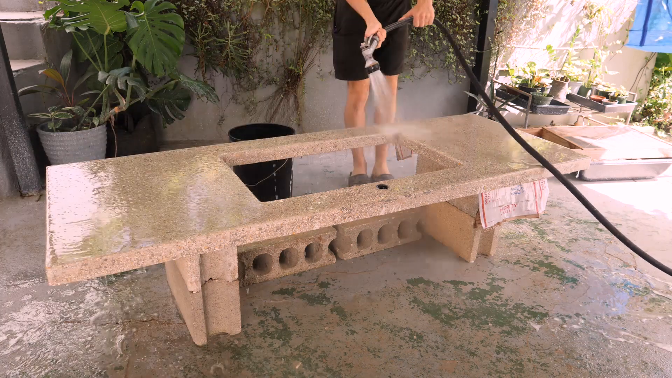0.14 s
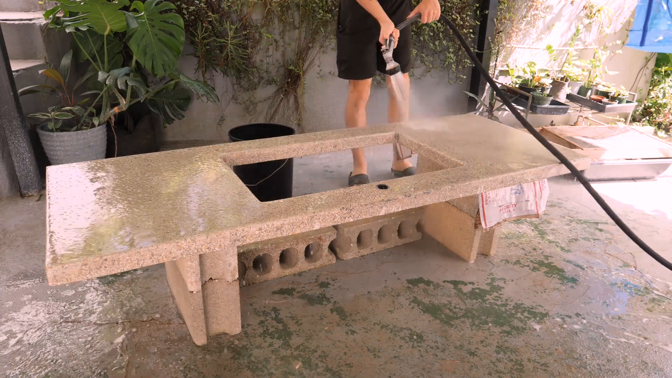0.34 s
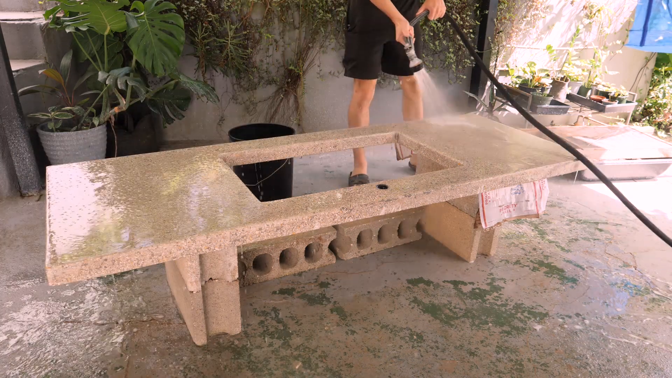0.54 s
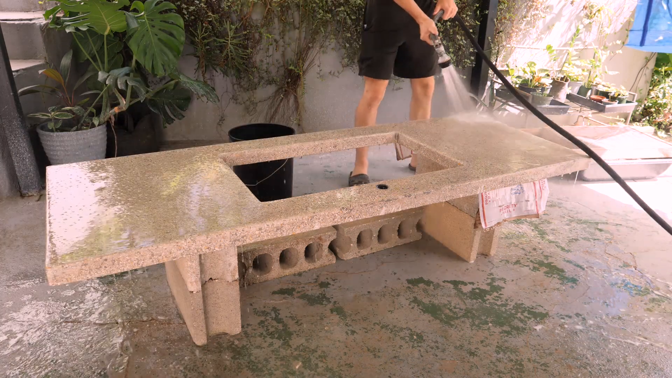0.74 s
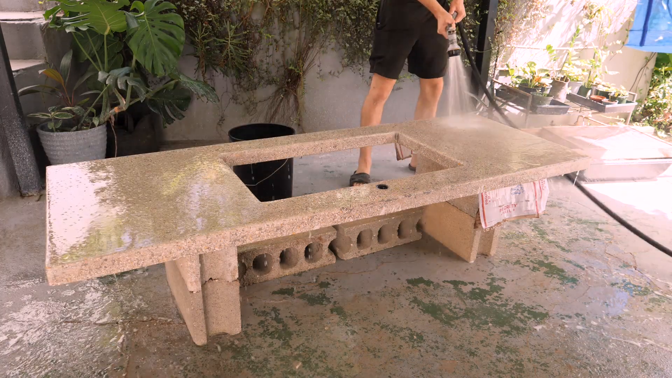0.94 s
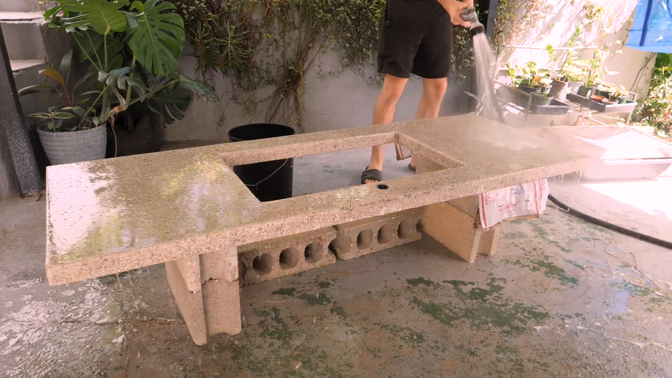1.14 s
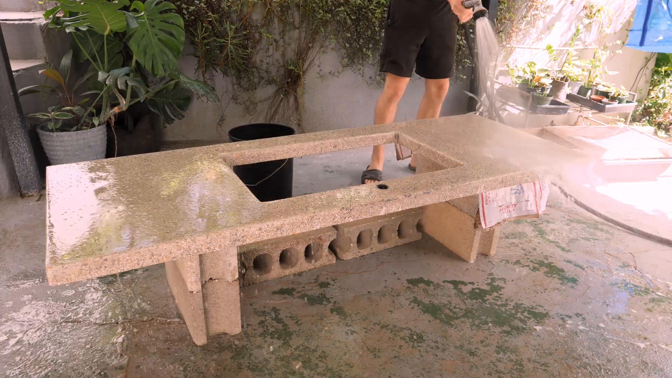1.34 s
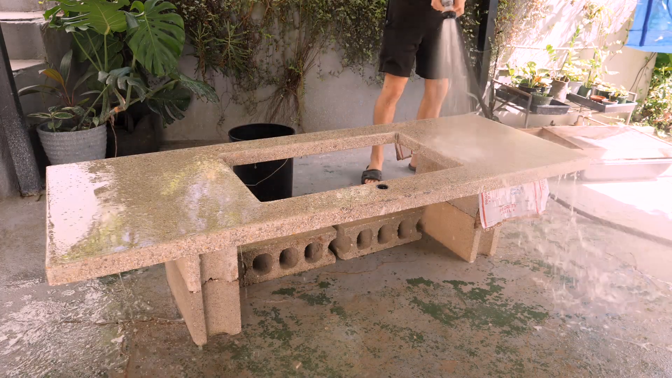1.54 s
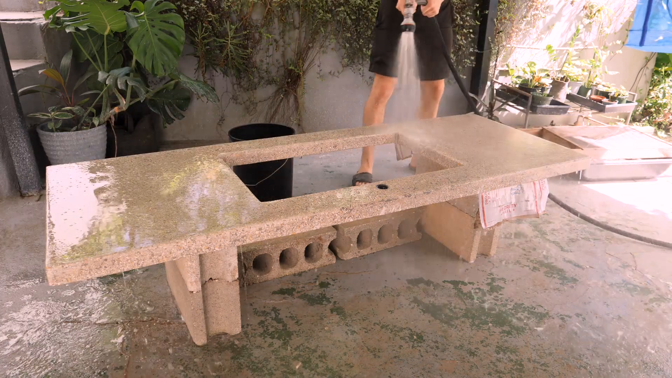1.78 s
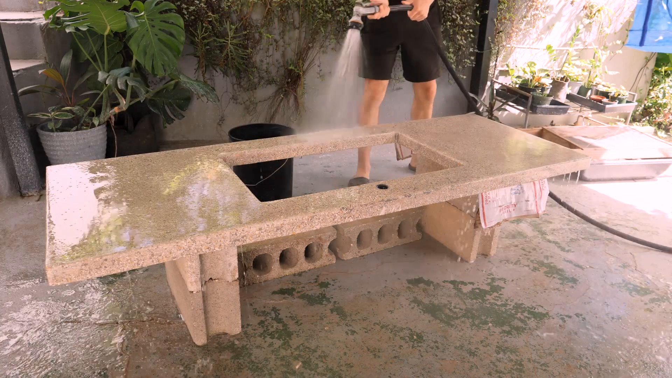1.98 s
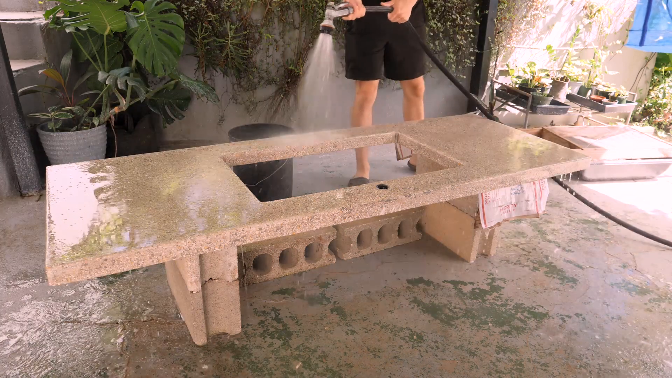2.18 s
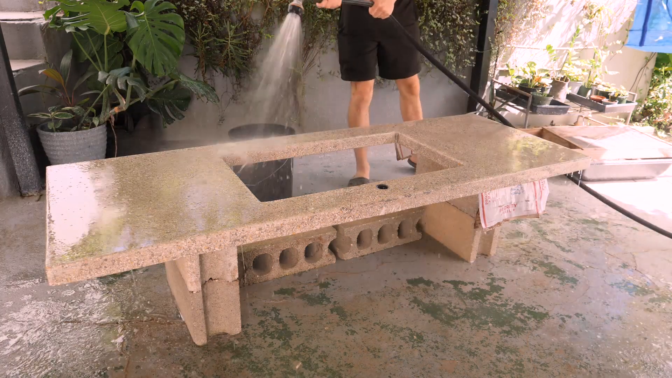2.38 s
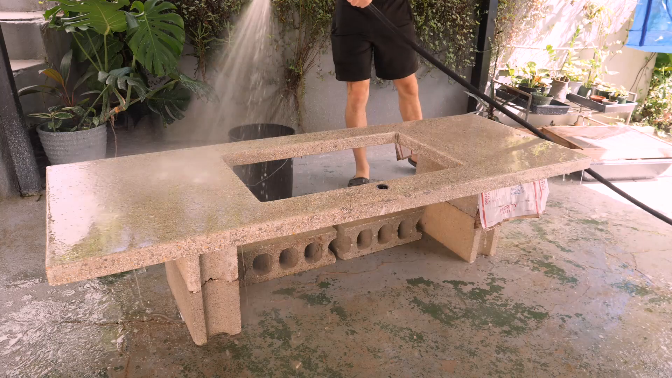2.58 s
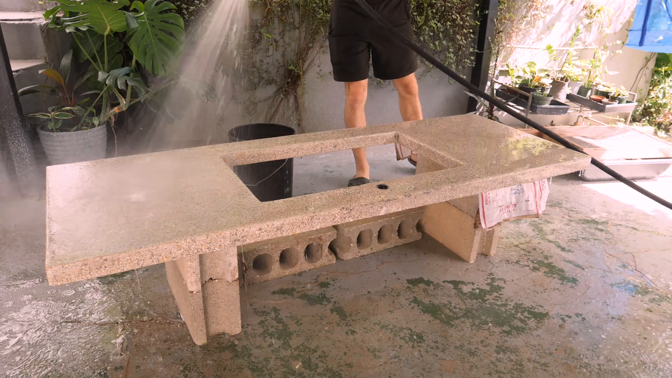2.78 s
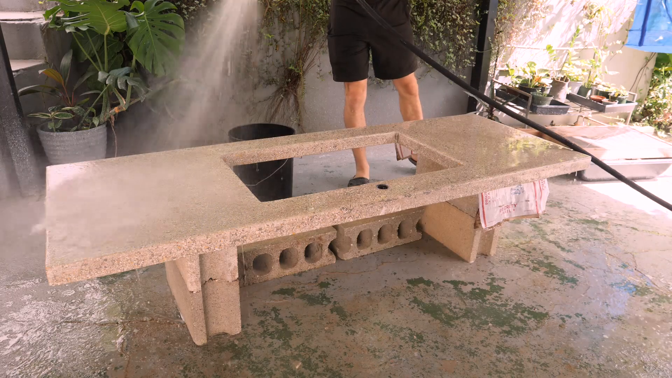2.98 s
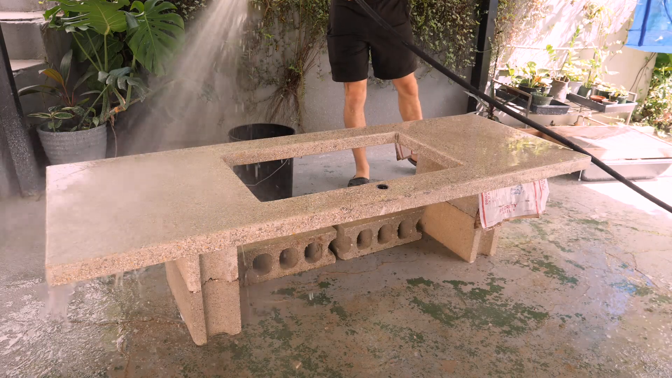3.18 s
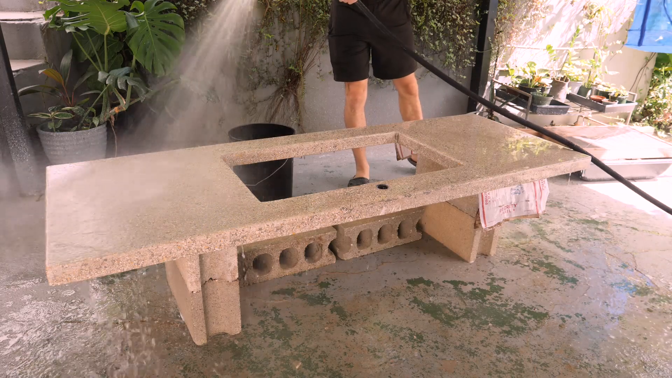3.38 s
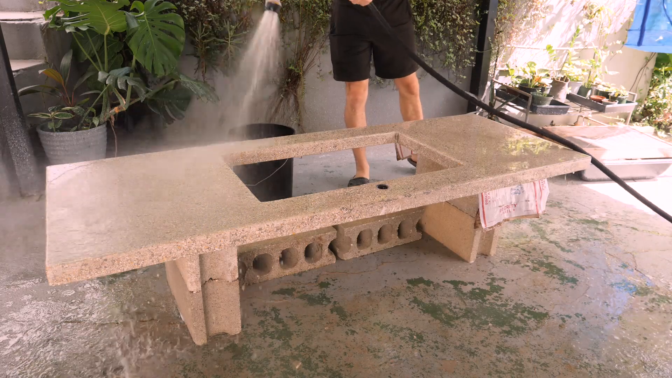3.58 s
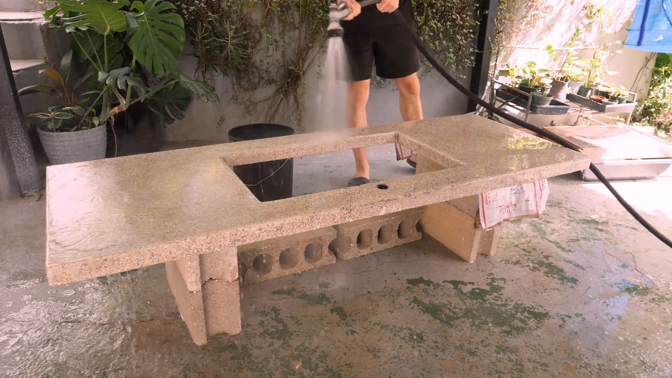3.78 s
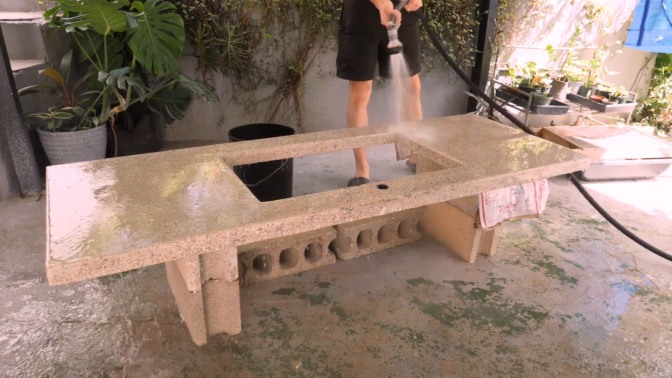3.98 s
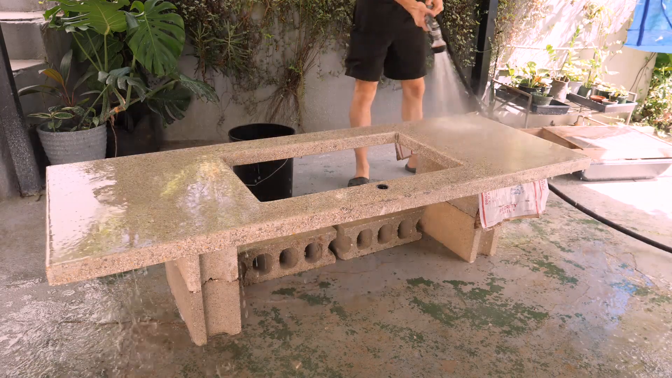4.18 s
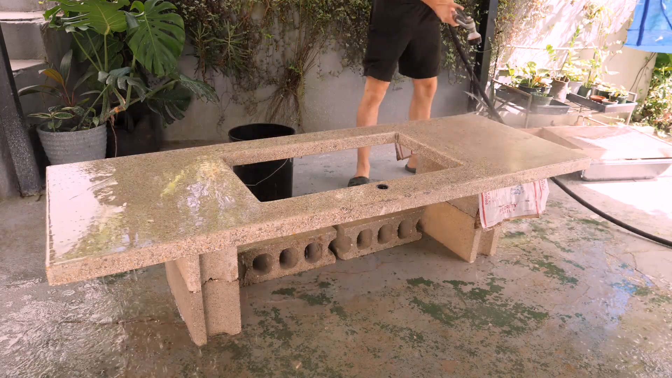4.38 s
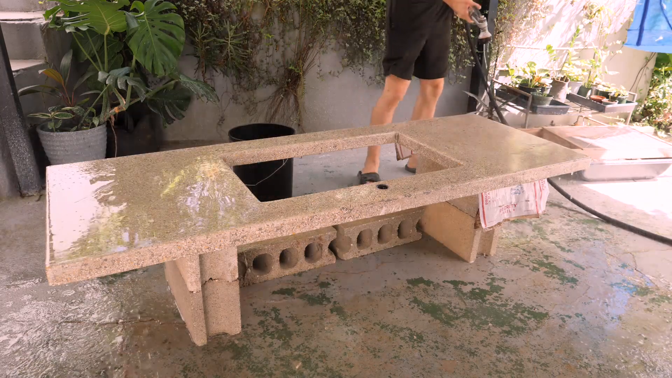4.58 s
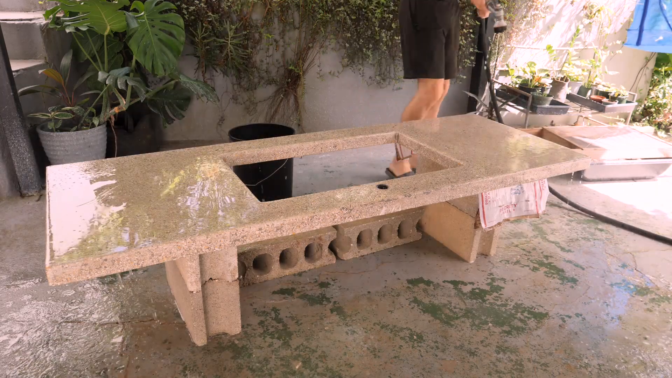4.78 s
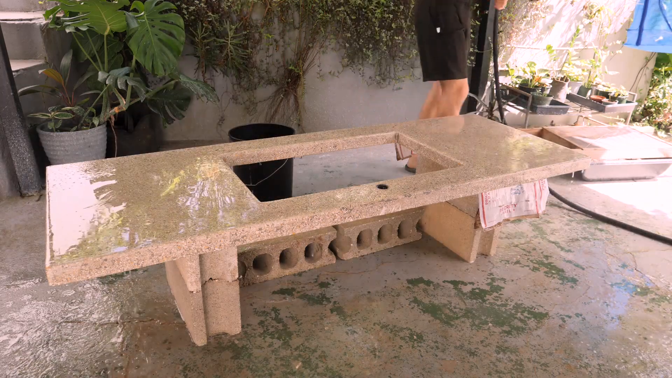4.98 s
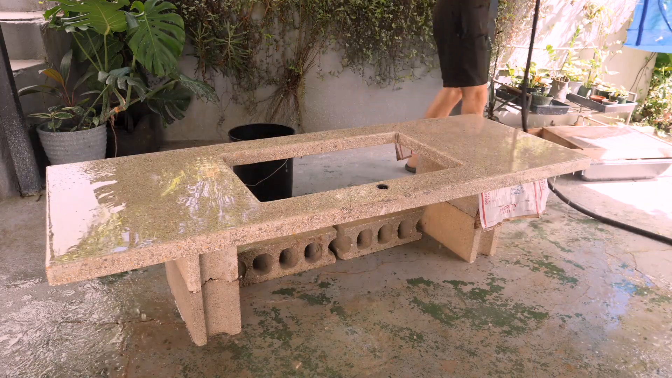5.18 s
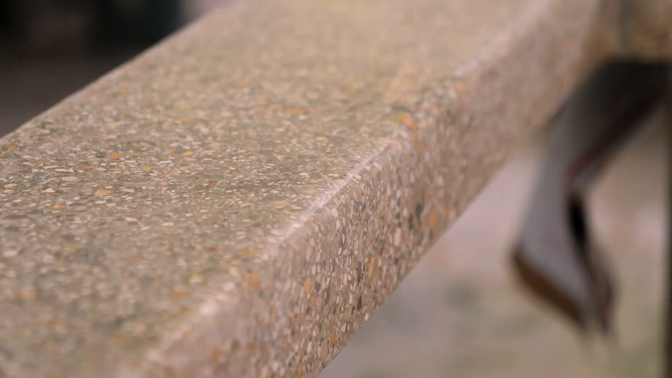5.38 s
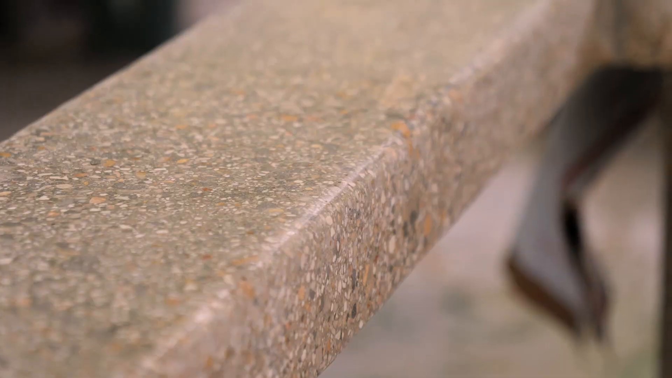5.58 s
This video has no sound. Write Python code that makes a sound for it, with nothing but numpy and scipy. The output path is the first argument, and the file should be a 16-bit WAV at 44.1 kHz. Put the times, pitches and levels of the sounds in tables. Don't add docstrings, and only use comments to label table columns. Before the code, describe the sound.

Steady bright water spray drums on a wet stone countertop outdoors, stops abruptly, leaving ticking drips, footsteps and then a sudden quiet.

```python
import sys
import numpy as np
from scipy import signal
from scipy.fft import rfft, irfft, next_fast_len
from scipy.io import wavfile
from scipy.ndimage import uniform_filter1d, map_coordinates

SR = 44100
rng = np.random.default_rng(int(sys.argv[2]) if len(sys.argv) > 2 else 0)


def elevation(decibels):
    levels = np.asarray(decibels, float)
    return 10 ** (levels / 20)


def file_out(sig):
    cols = np.atleast_2d(sig).T
    lim = np.clip(cols, -1, 1)
    pcm = np.round(lim * 32767).astype(np.int16)
    wavfile.write(sys.argv[1], SR, pcm)


N = 248670
T = np.arange(N) / SR

# start_s, squareness (negative glancing, positive full on), left_minus_right_db,
# nozzle_facing_db
AIM = [(0, -0.61, 0, 0.5), (.32, 0.2, -0.1, 2), (.89, -0.32, -1.4, 1.5), (1.31, -1.15, -1.5, -0.5),
       (1.46, -0.64, 0, 1.5), (1.62, -.7, -1.3, 3), (2.06, 0.082, -0.3, 0.5), (2.29, 0.24, -0.3, 1.5),
       (2.82, -0.22, 1.4, -1), (3.14, 0.18, 0.2, 0), (3.39, .2, 1.2, -1), (3.65, -.2, .42, -1),
       (3.92, 0.17, 0, -1.5), (4.28, -1.95, -.2, 4), (4.45, 0.24, 1.2, 1)]
# start_s, pitch_hz, level_db
SLAB_SPOTS = [(0, 861, -57), (0.25, 840, -55), (0.571, 1070, -56), (1.2, 906, -56), (1.36, 901, -52.5),
              (1.53, 898, -54.5), (1.51, 1292, -52.5), (1.79, 1436, -57), (2.4, 1195, -57),
              (2.43, 1001, -54), (2.6, 1190, -60), (2.64, 826, -69), (2.76, 734, -62), (2.93, 1087, -57),
              (2.97, 916, -57), (3.07, 725, -60), (3.17, 1036, -54), (3.29, 1143, -57.5), (3.45, 1030, -56),
              (3.8, 850, -56)]
# frequency_hz, level_db (per Hz)
HISS_COLOUR = [(2350, -29), (4000, -4.5), (4490, -2.5), (5270, -4), (5880, -4), (7570, -2), (9530, -0.5),
               (12900, 0.5), (14700, -3.5), (16000, -8.5)]
# frequency_hz, level_db (per Hz)
SPLASH_COLOUR = [(820, -14), (1400, -3.5), (1590, -4.5), (2200, -1), (2570, 0.5), (3180, -1.5), (4490, -3),
                 (5280, -5), (6040, 4), (7000, -11.5), (9100, -7), (15400, -120)]
# frequency_hz, level_db (per Hz)
SLAB_COLOUR = [(150, -38), (250, -24), (524, -15), (620, -12.5), (710, -7.5), (955, -4), (1010, -2.5),
               (1510, -8.5), (2000, -15), (2600, -24), (4400, -120)]
# frequency_hz, likeness (0 to 1)
LIKENESS = [(60, .9999), (300, 1), (700, 0.97), (1400, 0.87), (3000, 0.89), (5000, .84), (8000, 0.82),
            (10500, 0.82), (15000, 0.32)]
# start_s, level_db
RUNOFF = [
    (4.43, -60.5),
    (4.55, -61.5),
    (4.63, -59.5),
    (4.84, -64.5),
    (5.07, -67),
    (5.24, -61),
    (5.41, -59.5),
    (5.45, -61),
]
# start_s, peak_db, pitch_hz, left_minus_right_db
DROPS = [(4.452, -39, 5250, 6), (4.502, -35, 5950, -6), (4.538, -53, 5370, 1), (4.581, -34, 8460, 5),
         (4.6453, -34, 9000, 6.5), (4.6534, -37, 9050, 2), (4.6884, -45, 8510, -2),
         (4.763, -42, 8950, -0.5), (4.8308, -36, 8200, 6.5), (4.877, -40, 5560, -6),
         (4.9427, -36, 10200, 4), (4.995, -49, 8910, 3.5), (5.0964, -55, 8320, 3), (5.112, -36.5, 7900, 5),
         (5.1514, -45, 7850, 0.0), (5.2177, -45, 4090, 1), (5.239, -41, 8830, -8), (5.323, -36, 7260, 1)]
# start_s, level_db, pitch_hz, width_octaves
SLAPS = [(4.504, -60, 5650, 0.32), (4.55, -59, 2080, 0.61), (4.59, -66, 7900, .53),
         (4.652, -51.5, 8860, 0.85), (4.684, -44, 8300, 0.74), (4.704, -51.5, 2650, .25),
         (4.706, -55, 3620, 0.28), (4.71, -48, 5030, 1), (4.763, -53.5, 9000, .5), (4.785, -61, 3760, .4),
         (4.84, -55, 9000, .6), (4.877, -52, 5760, 0.78), (4.995, -55.5, 8900, .5),
         (5.022, -58.5, 3100, 0.98), (5.104, -52.5, 4100, 0.42), (5.113, -52, 8500, 0.73),
         (5.175, -56.5, 6500, 0.67), (5.217, -48, 4180, 0.52), (5.239, -43.5, 9000, 0.34),
         (5.243, -51, 4850, 0.81), (5.29, -52, 3850, 1), (5.322, -46, 7660, 0.45),
         (5.322, -50.5, 5500, 0.19), (5.324, -51, 3970, 0.67)]
# start_s, level_db, pitch_hz
SHEETS = [
    (1.21, -46.5, 3730),
    (1.6, -44.5, 4830),
    (1.665, -42.5, 3180),
    (1.739, -48, 4730),
    (1.86, -47.5, 4000),
    (3.43, -48, 2750),
    (3.575, -43, 2750),
    (3.605, -47.5, 2710),
    (3.66, -47.5, 3830),
    (3.97, -51.5, 2460),
]
# frequency_hz, time_to_fall_60_db_s
YARD_DECAY = [(200, 0.38), (2000, 0.23), (10000, 0.23)]
# start_s, level_db
STEPS = [
    (4.385, -72.5),
    (4.615, -65),
    (4.865, -67.5),
    (5.1, -65),
    (5.365, -67.5),
]
# delay_after_heel_s, level_db, pitch_hz, width_octaves
STEP_PARTS = [
    (-.027, -0.5, 730, 1),
    (0, -0.5, 300, 2.4),
    (0, -1, 497, .07),
    (0.042, -7.5, 118.2, 0.36),
]
# start_s, level_db, pitch_hz, time_to_fall_60_db_s
KNOCKS = [
    (1.143, -58, 224, 0.47),
    (1.143, -52.5, 433, 0.31),
    (5.44, -66, 270, .3),
    (5.495, -63, 210, .12),
]
# start_s, rumble_db
TRUCK = [
    (0, -60),
    (.29, -57.5),
    (.5, -57),
    (.64, -58),
    (.94, -71),
    (1.15, -78),
    (1.6, -110),
]
# pitch_hz, level_over_rumble_db
TRUCK_HUMS = [(85, -7), (143, -8), (241, -10), (324, -14)]
# frequency_hz, level_db (per Hz)
RUMBLE_COLOUR = [(29, -46), (50, -13), (75, -11), (108, -7), (144, 1), (210, -5), (237, -3.5), (296, -6),
                 (330, -2.5), (407, -8), (514, -7.5), (580, -8), (700, -21), (910, -56), (1540, -120)]
# frequency_hz, level_db (per Hz)
DEEP_COLOUR = [(10, -6), (18, 0), (26, -5), (34, -15), (50, -17), (62, -9), (80, -14), (110, -40),
               (180, -120)]
# start_s, level_db
STREET = [
    (0, -62),
    (1.43, -79),
    (1.98, -73.5),
    (2.44, -81),
    (3.1, -76.5),
    (4.25, -77.5),
    (4.45, -72),
    (5.05, -73.5),
    (5.45, -81),
]
# frequency_hz, level_db (per Hz)
STREET_COLOUR = [(60, -23), (85, -9.5), (115, -2), (170, -1.5), (230, -9.5), (350, -6.5), (520, -7),
                 (800, -17), (1300, -39), (2500, -120)]
# start_s, firing_hz, level_db
ENGINE = [
    (4.9, 50, -88),
    (5.2, 58, -80),
    (5.4, 68, -74),
    (5.45, 69, -71),
    (5.49, 68, -73),
    (5.53, 68, -86),
    (5.64, 68, -95),
]
# multiple_of_firing, level_db
ENGINE_ORDERS = [(2, -5), (3, -10), (4, -6), (5, 0), (6, -10)]
# frequency_hz, level_db (per Hz)
QUIET_COLOUR = [(70, -20), (130, -3), (270, -7.5), (520, -15), (1400, -17.5), (3000, -25), (8700, -26.5),
                (12500, -29), (13600, -41), (14500, -120)]
# pitch_hz, level_db
QUIET_HUMS = [(424, -76), (494, -79)]
# frequency_hz, side_over_middle_db
LEAST_SIDE = [(200, -27), (500, -40), (1500, -30), (2100, -10), (3500, -9.5), (4500, -10.5), (5500, -9),
              (6500, -10.5), (7300, -6), (9300, -6), (10000, -30)]

JET_HISS_DB, JET_SPLASH_DB, JET_DRUM_DB = -44.5, -53, -54
SQUARE_HISS_DB, SQUARE_SPLASH_DB, SQUARE_DRUM_DB = -0.44, -1, 2
SHUT_S, HISS_DIES_S, SPLASH_LEADS_S, BODY_DIES_S = 4.405, 0.04, 0.025, 0.035
RUNOFF_SPLASH_DB, RUNOFF_DRUM_DB = -4, -13.5
FACING_LOSS = 0.16
NOZZLE_HZ, NOZZLE_WIDTH_HZ, NOZZLE_DB = 9000, 1600, -54.5
FILM_DB, FILM_FADES_DB_PER_S = -60.5, 4
DWELL_S = 0.2
TICKS_DB, TICK_HZ, TICK_OCTAVES, TICK_SCATTER_DB = 9, 6800, 0.4, 3.5
SHEET_OCTAVES, SHEET_RISE_S, SHEET_T60_S = 0.7, 0.013, 0.35
SLAP_RISE_S, SLAP_T60_S, NARROW_RINGS_S, SLAP_ECHO_DB = 0.0015, 0.18, 0.016, -7.5
STEP_RISE_S, STEP_T60_S = 0.0063, 0.33
KNOCK_OCTAVES, KNOCK_RISE_S = 0.63, 0.0032
DEEP_DB, DEEP_LEADS_S = -6, 0.1
QUIET_DB, CUT_S = -71.5, 5.453
PEAK_TOP, PEAK_KNEE = 0.032, 6
TOP_HZ, NOTCH_HZ, NOTCH_WIDTH_HZ = 15850, 15500, 45


def spray():
    _, pan_db, facing_db = curves(AIM)
    return (impacts(facing_db) + nozzle(facing_db) + film() + slab()) * panned(pan_db)


def impacts(facing_db):
    square = curves(AIM)[0]
    runoff = elevation(curves(RUNOFF)[0] + 2.4 * wobble(35)) * (T > SHUT_S)
    flow = wobble(9)
    shut = closing(BODY_DIES_S, SPLASH_LEADS_S)

    def level(jet_db, aim_db, valve, runoff_db):
        return np.hypot(elevation(jet_db + aim_db * square) * valve, elevation(runoff_db) * runoff)

    hiss = rush(HISS_COLOUR, patchy_db=1.1, grain=0.19, drops_per_s=1100.0, size_db=-4.0)
    hiss = elevation(0.17 * flow - FACING_LOSS * facing_db + 0.52 * wobble(25.23)) * hiss
    splash = rush(SPLASH_COLOUR, patchy_db=2.17, grain=0.23, drops_per_s=700.0, size_db=6.0)
    splash = elevation(0.3 * flow + 0.53 * wobble(16)) * splash
    drumming = elevation(0.39 * wobble(10)) * rush(SLAB_COLOUR, patchy_db=4.0, size=2048, count=2)
    water = level(JET_HISS_DB, SQUARE_HISS_DB, closing(HISS_DIES_S), 0) * hiss
    water += level(JET_SPLASH_DB, SQUARE_SPLASH_DB, shut, RUNOFF_SPLASH_DB) * splash
    water += level(JET_DRUM_DB, SQUARE_DRUM_DB, shut, RUNOFF_DRUM_DB) * drumming
    return water


def nozzle(facing_db):
    hiss = ringing([(NOZZLE_HZ, 0)], width_hz=NOZZLE_WIDTH_HZ)
    return elevation(NOZZLE_DB + facing_db) * closing(HISS_DIES_S) * hiss


def film():
    level_db = FILM_DB - FILM_FADES_DB_PER_S * T + 3.9 * wobble(12)
    return elevation(level_db) * closing(BODY_DIES_S, SPLASH_LEADS_S) * ringing([(2550, 0)], width_hz=170)


def slab():
    out = np.zeros(N)
    t = np.arange(SR // 2) / SR
    dwell = np.sqrt(np.clip(np.sin(np.pi * np.minimum(t / DWELL_S, 1)), 0, 1))
    for s, hz, db in SLAB_SPOTS:
        drive = filtered(rng.standard_normal((2, len(t))), lambda f: 1 / (1 + (f / 38) ** 2) ** 2)
        turn = 2 * np.pi * hz * t
        ring = unit(drive[0] * np.cos(turn) + drive[1] * np.sin(turn))
        out[round(max(s, 0) * SR):][:len(t)] += elevation(db - 4.5) * dwell * ring
    return out


def closing(dies_s, leads_s=0.0):
    return np.exp(-np.clip(T - SHUT_S + leads_s, 0, None) / dies_s)


def drops():
    out = np.zeros((2, N))
    t = np.arange(300) / SR
    shape = elevation(-60 * t / 0.009) * (1 - np.exp(-t / 0.00027))
    for s, db, hz, pan_db in DROPS + stray(count=45):
        band = lambda f: 1 / (1 + (np.log2(f / hz + 1e-9) / 0.36) ** 4)
        click = filtered(rng.standard_normal(len(t)) * shape, band)
        click = elevation(db - 3.0) * click / np.abs(click).max()
        out[:, round(s * SR):][:, :len(t)] += np.outer(panned(pan_db), click)
    return out


def stray(count):
    u, g = rng.random((count, 2)), rng.standard_normal((count, 2))
    s = 4.45 + u[:, 0]
    runoff_db = np.interp(s, *np.transpose(RUNOFF))
    db = runoff_db + TICKS_DB - TICK_SCATTER_DB * np.log(u[:, 1] + 0.1)
    hz = TICK_HZ * 2 ** (TICK_OCTAVES * np.clip(g[:, 0], -2, 2))
    return np.c_[s, db, hz, 3 * g[:, 1]].tolist()


def slaps():
    rows = [(s, db, hz, SHEET_OCTAVES, SHEET_RISE_S, SHEET_T60_S) for s, db, hz in SHEETS]
    for s, db, hz, octaves in SLAPS:
        t60 = SLAP_T60_S + NARROW_RINGS_S / max(octaves, 0.1)
        rows.append((s, db, hz, octaves, SLAP_RISE_S, t60))
    return bursts(rows, fizz_db=-26.0, wide=0.37)


def yard(x):
    hz, t, z = signal.stft(rng.standard_normal((2, SR // 3)), SR, nperseg=256)
    fade = elevation(-60 * t / along(YARD_DECAY, hz)[:, None])
    tail = signal.istft(z * fade, SR, nperseg=256)[1]
    tail = (tail[0] + 0.35 * np.outer([1, -1], tail[1])) / np.linalg.norm(tail[0])
    late = np.pad(x.mean(0), (round(0.009 * SR), 0))
    return signal.fftconvolve(late[None], tail, axes=1)[:, :N]


def steps():
    rows = []
    for s, db in STEPS:
        for late, part_db, hz, octaves in STEP_PARTS:
            rows.append((s + late, db + part_db, hz, octaves, STEP_RISE_S, STEP_T60_S))
    rows += [(s, db, hz, KNOCK_OCTAVES, KNOCK_RISE_S, t60) for s, db, hz, t60 in KNOCKS]
    return bursts(rows, fizz_db=-120, wide=0.08)


def traffic():
    return truck() + street() + engine()


def truck():
    rumble_db, = curves(TRUCK)
    deep_db = DEEP_DB + np.interp(T + DEEP_LEADS_S, T, rumble_db)
    deep = elevation(deep_db + 2.3 * wobble(5.2)) * rush(DEEP_COLOUR, patchy_db=-2.0)
    rumble = rush(RUMBLE_COLOUR, patchy_db=1.0) + ringing(TRUCK_HUMS, width_hz=12)
    return deep + elevation(rumble_db - 1.0 + 0.5 * wobble(12.8)) * rumble


def street():
    street_db, = curves(STREET + [(5.5, -100)])
    return elevation(street_db + 2.4 * wobble(7.1)) * rush(STREET_COLOUR, patchy_db=1.0)


def engine():
    firing_hz, engine_db = curves([(0, 62, -120)] + ENGINE)
    turns = 2 * np.pi * np.cumsum(firing_hz * (1 + 0.0046 * wobble(17))) / SR
    hum = sum(elevation(db) * np.sin(k * turns + k * k) for k, db in ENGINE_ORDERS)
    return elevation(engine_db) * elevation(1.5 * wobble(15)) * hum


def quiet_yard():
    air = elevation(QUIET_DB - 1.5) * rush(QUIET_COLOUR, patchy_db=0.6)
    return air + np.clip((T - 5.5) / 0.05, 0, 1) * ringing(QUIET_HUMS, width_hz=4)


def rush(spectrum, patchy_db, grain=0.0, drops_per_s=3000.0, size_db=4.0, size=512, count=6):
    z = signal.stft(rng.standard_normal((2, N)), nperseg=size)[2]
    field = uniform_filter1d(rng.standard_normal(z.shape), size=count, axis=1)
    field = uniform_filter1d(field, size=14, axis=2)
    pair = unit(signal.istft(z * elevation(patchy_db * unit(field)), nperseg=size)[1][:, :N])
    if grain:
        hit = rng.random(N) < drops_per_s / SR
        strikes = hit * elevation(size_db * np.clip(rng.standard_normal(N), -2, 2))
        splat = signal.lfilter([1], [1, -0.93], strikes) * rng.standard_normal((2, N))
        share = np.clip(grain, 0, 0.5)
        pair = np.sqrt(1 - share) * pair + np.sqrt(share) * unit(splat)
    turn = lambda hz: np.arccos(np.clip(along(LIKENESS, hz), -1, 1)) / 2
    colour = lambda hz: elevation(along(spectrum, hz)) * np.minimum(hz / spectrum[0][0], 1) ** 4
    mid, side = filtered(pair, lambda hz: colour(hz) * [np.cos(turn(hz)), np.sin(turn(hz))])
    return unit(np.array([mid + side, mid - side]))


def bursts(rows, fizz_db, wide):
    out = np.zeros((2, N + SR))
    t = np.arange(SR // 4) / SR
    uneven = elevation(1.8 * np.pad(wobble(220), (0, SR)))
    for s, db, hz, octaves, rise, t60 in rows:
        peak = lambda f: 1 / (1 + (np.log2(f / hz + 1e-9) / octaves) ** 2) ** 2
        band = lambda f: peak(f) + elevation(fizz_db) * (f > hz)
        mid, side = filtered(rng.standard_normal((2, len(t))), band)
        pair = unit(np.array([mid + wide * side, mid - wide * side]))
        shape = (1 - np.exp(-t / rise)) * elevation(db - 60 * t / t60)
        shape = shape * np.minimum((t[-1] - t) / 0.04, 1)
        out[:, round(s * SR):][:, :len(t)] += shape * pair
    return (uneven * out)[:, :N]


def ringing(lines, width_hz):
    peaks = lambda f: sum(elevation(db) / (1 + ((f - hz) / width_hz) ** 2) ** 2 for hz, db in lines)
    total = np.sqrt(sum(elevation(2 * db) for hz, db in lines))
    return total * unit(filtered(rng.standard_normal(N), peaks))


def unit(x):
    return x / np.sqrt(np.mean(x ** 2) + 1e-20)


def along(points, hz):
    f, v = np.transpose(points)
    return np.interp(np.log(hz + 1), np.log(f + 1), v)


def curves(rows):
    s, *cols = np.transpose(rows)
    return [np.interp(T, s, c) for c in cols]


def wobble(rate):
    coarse = T[::16]
    points = rng.standard_normal(int(N * rate / SR) + 4)
    return np.interp(T, coarse, map_coordinates(points, [coarse * rate]))


def filtered(x, response):
    m = next_fast_len(x.shape[-1] + 8192)
    return irfft(rfft(x, m) * response(np.fft.rfftfreq(m, 1 / SR)), m)[..., :x.shape[-1]]


def panned(db):
    return np.array([elevation(db / 2), elevation(-db / 2)])


def narrowed(x):
    pair = np.array([x[0] + x[1], x[0] - x[1]]) / 2
    hz, _, z = signal.stft(pair, SR, "cosine", nperseg=2048, noverlap=1024)
    edges = np.unique(np.r_[np.geomspace(4, 320, 34).astype(int), 320:1025:32])
    power = np.add.reduceat(np.abs(z) ** 2, edges, axis=1)
    loud = power[0].sum(0)
    spare_db = np.clip(0.25 * 10 * np.log10(loud / np.median(loud) + 1e-9), -9, 0)
    least_db = along(LEAST_SIDE, hz[edges])[:, None] + spare_db
    kept = power[1] > power[0] * elevation(2 * least_db)
    band = np.maximum(np.searchsorted(edges, np.arange(len(hz)), "right") - 1, 0)
    z[1] *= kept[band]
    mid, side = signal.istft(z, SR, "cosine", nperseg=2048, noverlap=1024)[1][:, :N]
    return np.array([mid + side, mid - side])


def scene():
    ticks, sheets = drops(), slaps()
    echo = elevation(-5.0) * yard(ticks + elevation(SLAP_ECHO_DB) * sheets)
    wet = spray() + ticks + echo + sheets
    before = np.clip((CUT_S - T) / 0.00084, 0, 1)
    return wet * before + quiet_yard() * (1 - before) + steps() + traffic()


def low_pass(x):
    return signal.sosfilt(signal.butter(12, 16360, fs=SR, output="sos"), x)


def record(dry):
    soft = dry / (1 + np.abs(dry / PEAK_TOP) ** PEAK_KNEE) ** (1 / PEAK_KNEE)
    gap = lambda hz: 1 - 0.8 / (1 + ((hz - NOTCH_HZ) / NOTCH_WIDTH_HZ) ** 2)
    mix = narrowed(filtered(soft, lambda hz: (hz < TOP_HZ) * gap(hz)))
    return low_pass(mix)


dry = scene()
out = record(dry)
file_out(out)
```